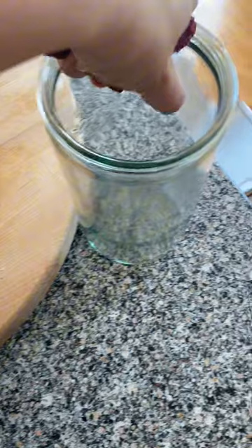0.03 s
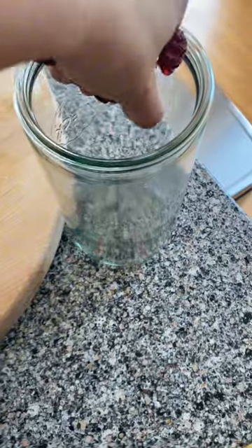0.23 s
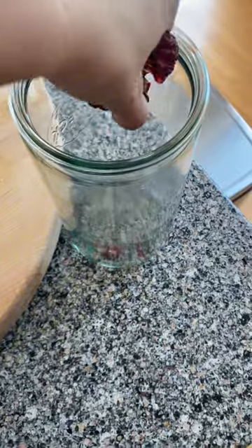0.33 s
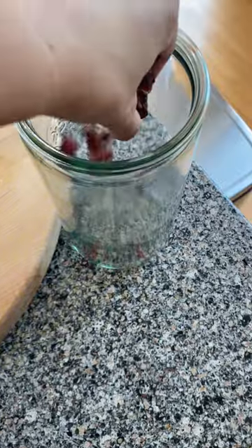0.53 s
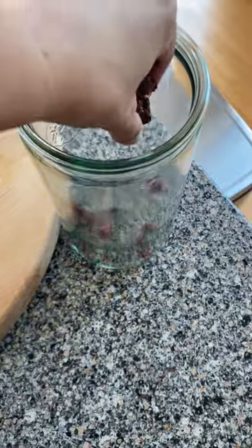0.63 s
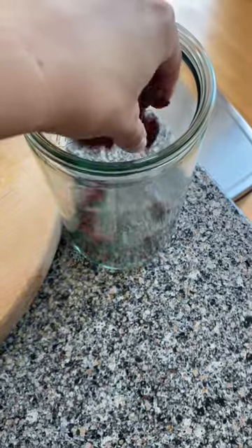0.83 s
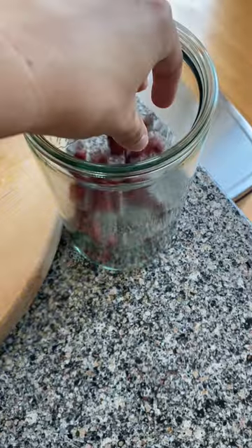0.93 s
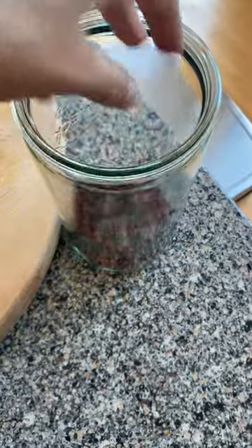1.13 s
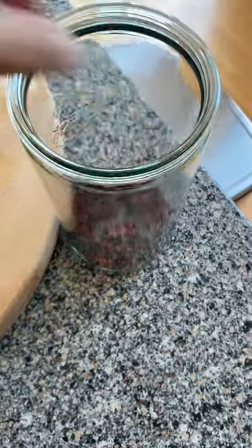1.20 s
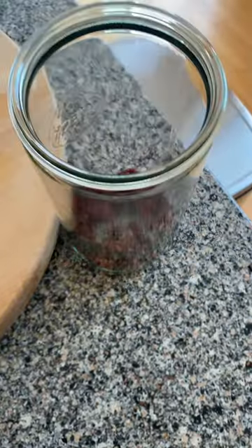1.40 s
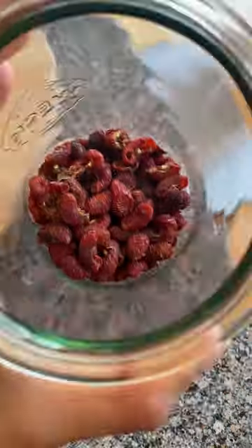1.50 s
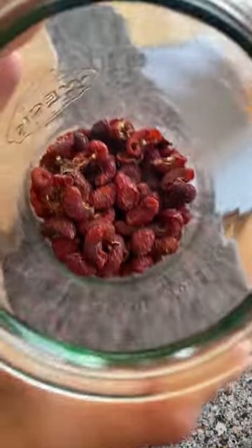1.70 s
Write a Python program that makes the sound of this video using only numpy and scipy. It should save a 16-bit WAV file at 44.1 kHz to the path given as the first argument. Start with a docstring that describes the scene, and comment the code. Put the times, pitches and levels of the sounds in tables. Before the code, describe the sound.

Dried berries clatter into a glass jar, heard close in a quiet kitchen. At 0.1 seconds the jar bumps a stone counter with a hollow thud. A few berries click in from 0.25 seconds, then denser spills come around 0.6 to 0.8 and 1.0 seconds, briefly ringing the glass. They tumble and settle by 1.45 seconds. A very faint knock follows near 1.6 seconds, over soft rumble and hiss.

```python
"""A hand knocks a glass jar against a stone counter: the foot thuds, the air inside booms.
From 0.23 s dried berries fall into it in a few spills. Each snaps, clatters in the jar's air
and rings the glass; the rest tumble and settle by 1.45 s. One faint knock follows at 1.58 s.
A close microphone pair hears it all in a quiet kitchen, over soft rumble and hiss."""
import sys
import numpy as np
from scipy import signal
from scipy.fft import rfft, irfft, next_fast_len
from scipy.io import wavfile

SR = 44100
rng = np.random.default_rng(int(sys.argv[2]) if len(sys.argv) > 2 else 0)


def to_wav(sig):
    """Store sig (one row per channel, or 1-D mono) as 16-bit WAV at the path in sys.argv[1].

    Samples outside -1..1 are clipped; the rate is SR.
    """
    pcm = np.clip(np.atleast_2d(sig), -1, 1) * 32767
    pcm = np.round(pcm).astype(np.int16)
    wavfile.write(sys.argv[1], SR, pcm.T)  # frames by channels


N = 77175

# berry landings: start_s, snap_db, clatter_db, hardness_db_per_oct, base_db, wall_db, upper_twin_share
LANDINGS = [ (0.229, -48, -65, -6.5, -59, -40, .5), (0.2657, -17, -29, 8, -25, -35, 0),
            (0.363, -29.5, -42, 10, -64, -34, .5), (0.408, -43, -49.5, -3.5, -55, -46.5, .5),
            (0.4619, -44.5, -48.5, 1.5, -69, -61, .5), (0.5104, -49.5, -55, -2, -89, -77, .5),
            (0.5959, -13, -29.5, 3.5, -28.5, -49.5, 1), (.598, -21.5, -36, 5.5, -45, -53, 1),
            (0.6322, -29.5, -27.5, 0.5, -33.5, -44.5, 1), (.645, -18.5, -31.5, 17.5, -45.5, -47, 1),
            (0.6506, -31.5, -32.5, 1.5, -24, -45.5, 1), (0.6611, -35.5, -35.5, -2.5, -39, -52, 1),
            (.670, -33.5, -36, 1, -27, -63.5, 1), (0.7053, -35.5, -43, 6, -52.5, -38.5, .5),
            (.722, -38.5, -45.5, 8.5, -50.5, -39.5, .5), (.7418, -40, -37.5, 0, -31.5, -59, 0),
            (.750, -34.5, -49, -2, -49.5, -52, 0), (.7675, -34.5, -49.5, 4.5, -46, -61.5, 0),
            (.7812, -31, -40.5, 2.5, -35, -58, 0), (0.8046, -9.5, -29, 14.5, -40, -49, 0),
            (0.827, -29.5, -47.5, -1, -56.5, -53.5, 0), (.855, -42.5, -48, -4.5, -45.5, -60.5, 0),
            (0.8924, -49, -48, 4.5, -41.5, -43, 0), (0.911, -34, -55, 6.5, -66.5, -53, 0),
            (.9605, -31, -32.5, 0.5, -41, -40.5, 1), (.965, -27, -28, -0.5, -35.5, -51.5, .5),
            (.970, -27, -41.5, -2, -44.5, -53.5, .5), (.983, -27, -27.5, -1, -30, -39.5, 1),
            (.9897, -32, -39.5, 8, -22, -49.5, 1), (1.0152, -25.5, -30.5, 0, -33, -35, 1),
            (1.021, -35, -32, -1, -41, -47.5, .5), (1.027, -29.5, -22.5, 2, -24.5, -40.5, 1),
            (1.0371, -27, -26.5, 1.5, -27.5, -42.5, .5), (1.053, -33, -42, 6, -37.5, -54, 1),
            (1.0895, -27, -55.5, -2.5, -51.5, -57.5, .5), (1.1087, -22, -32.5, 2.5, -45.5, -48.5, .5),
            (1.1738, -53, -61, -10, -48.5, -71, 0), (1.320, -72.5, -77.5, -4, -63.5, -88.5, 1),
            (1.359, -74.5, -71, -5, -71.5, -89.5, 1), (1.4442, -76, -77.5, -4.5, -64.5, -91.5, 1)]
# glass modes, twin base modes first: pitch_hz, base_hit_db, wall_hit_db, t60_s
GLASS_MODES = [(3715.4, 3.5, -25.5, 0.2), (3761, 5.5, -17, 0.11), (1413.7, -30, -18, 0.75),
               (2815, -39.5, -9, 0.17), (3265, -31, 1, 0.21), (3367, -29.5, -2.5, .25),
               (3714, -13, -29, .15), (4160, -9.5, -19.5, 0.13), (4400, -27.5, -5.5, 0.093),
               (5050, -20, -29, .13), (5750, -17, -26, 0.1), (6100, -25, -3.5, 0.083), (7410, -3, -13, .14),
               (7535, -7, -20, .11), (10570, -20, -18.5, .17), (11930, -15.5, -18.5, .11),
               (13827, -29, -23.5, .12)]
# air modes of the jar: pitch_hz, knock_db, berry_db, t60_s
AIR_MODES = [(347, 3, -26.5, 0.18), (678, -24, -25, 0.11), (1116.8, -17, -5, 0.064),
             (1246, -20, -16.5, .12), (2003, -24, -17.5, 0.21)]
# berry contact: freq_hz, density_db
SNAP_SPECTRUM = [(200, -33), (1100, -19), (2500, -24), (4500, -30), (7800, 10), (10000, -11.5),
                 (13000, -12.5), (16500, -27.5)]
# echoes in the jar: freq_hz, density_db
CLATTER_SPECTRUM = [(100, -30), (400, -19.5), (750, -5.5), (1150, -5.5), (1550, -16), (2100, -4.5),
                    (3050, -8), (3400, -3), (4200, 3.5), (5300, 1.5), (7300, 3.5), (9000, -5), (11000, -8),
                    (12200, -5.5), (14500, -16.5), (15600, -6), (16200, -40)]
# tumbling contacts: time_s, level_db
TUMBLE_ENVELOPE = [(.05, -110), (.075, -57.5), (.10, -70.5), (.22, -73.5), (.28, -39.5), (.34, -72),
                   (.42, -50), (.57, -76), (.62, -55.5), (.66, -44), (.70, -52.5), (.79, -46), (.94, -51.5),
                   (.99, -37.5), (1.04, -27.5), (1.08, -40.5), (1.17, -53.5), (1.28, -64), (1.38, -110)]
# jar rocking on the counter: start_s, thud_db, air_db, glass_db
KNOCK_HITS = [(.060, -51.5, -69.5, -72), (0.101, -40, -64.5, -81), (0.1114, -20.5, -41, -39.5),
              (0.1153, -26.5, -14, -50.5), (.1272, -27.5, -33, -45.5), (1.581, -61.5, -74, -92.5)]
# foot on stone: freq_hz, density_db
THUD_SPECTRUM = [(30, -30.5), (110, -22.5), (205, -7), (400, 3), (600, -10), (800, -10), (1350, -6),
                 (1800, -16.5), (2800, -22.5), (5000, -44.5), (15000, -44)]
# room decay: freq_hz, t60_s
ROOM_DECAY = [(150, 0.33), (350, 0.72), (1000, 0.47), (4000, 0.52), (8000, 0.15), (15000, 0.21)]
# room tail: freq_hz, gain_db
ROOM_SPECTRUM = [(150, -7), (250, -12), (350, -23), (500, -9.5), (800, -7), (2500, -14.5), (4000, -21),
                 (8000, -11), (15000, -4.5)]
# room tail, left to right: freq_hz, coherence
ROOM_COHERENCE = [(150, 1), (700, .2), (3000, .3), (5000, .6), (7400, 1), (15000, .8)]
# left microphone's phase lead: freq_hz, lead_rad
MIC_LEAD = [(100, 1.5), (380, -1.37), (950, 1.5), (1300, 0), (2300, 0.73), (2900, 2.04), (3500, 1.16),
            (4400, 1.5), (5000, 1.12), (6100, 1.5), (6950, 3.08), (7900, 3.2), (8700, 4.5), (9900, 5.5),
            (11500, 8), (12700, 8), (14700, 10.5), (15300, 23)]
# microphone balance: freq_hz, left_minus_right_db
MIC_BALANCE = [(200, 2), (480, -4), (1000, 1.5), (1900, 0), (2350, -3.5), (3100, 0.5), (3800, -1),
               (5000, 0.5), (7000, 1)]
# rumble: time_s, level_db
RUMBLE_ENVELOPE = [(0, -72.5), (.15, -65), (.25, -60.5), (.45, -66), (.56, -65), (.7, -65), (1.101, -68.5),
                   (1.399, -74), (1.75, -78.5)]
# rumble: freq_hz, density_db
RUMBLE_SPECTRUM = [(25, -19.5), (42, -17), (58, -1), (95, -5), (125, 3.5), (160, -15.5), (300, -11),
                   (1000, -53)]
# hiss: time_s, level_db
HISS_ENVELOPE = [(0, -68.5), (.55, -62), (1.299, -63.5), (1.48, -70), (1.56, -65.5), (1.63, -67.5),
                 (1.68, -73), (1.75, -71)]
# hiss: freq_hz, density_db
HISS_SPECTRUM = [(60, -15), (180, 0.5), (400, -2.5), (750, -3.5), (1400, -12.5), (2800, -23), (6000, -29.5),
                 (10000, -40.5), (16000, -46)]
# background, left to right: freq_hz, coherence
BACKGROUND_COHERENCE = [(60, .93), (300, 0.56), (800, .4), (3000, 0.11)]

SNAP_GAIN_DB, CONTACT_T60_S = 16.5, 0.0012
ECHO_DB, ECHO_T60_S = 6, 0.13
SCRAPE_DB, SCRAPE_T60_S = 16.5, 0.019
THUD_T60_S, KNOCK_HARDNESS_DB_PER_OCT, KNOCK_WALL_DB = 0.078, 4.5, -9.5
TICKS_PER_S, TICK_SPREAD_DB, TICK_T60_S = 480, 4, 0.01
RING_SAMPLES, ROOM_DELAY_S = 2 ** 15, 0.004
LOW_CUT_HZ, TOP_HZ = 160, 16800


def berries(glass, air):
    """Each landing: a sharp snap, a short scrape, dense echoes in the jar, ringing glass and air."""
    out = np.zeros(N)
    impulse = np.r_[1, np.zeros(RING_SAMPLES // 32)]
    snap = coloured(impulse, SNAP_SPECTRUM)
    jar_response = noise_burst(ECHO_T60_S)
    air_hz, _, air_db, _ = np.transpose(AIR_MODES)
    for start_s, snap_db, clatter_db, hardness, base_db, wall_db, upper_share in LANDINGS:
        contact = noise_burst(CONTACT_T60_S)[:RING_SAMPLES // 256]
        echoes = np.convolve(jar_response, contact / np.linalg.norm(contact))[:RING_SAMPLES]
        scrape = amp(SCRAPE_DB) * noise_burst(SCRAPE_T60_S)
        clatter = (amp(ECHO_DB) * echoes + scrape)[:RING_SAMPLES // 2]
        add(out, start_s, amp(snap_db + SNAP_GAIN_DB) * snap)
        add(out, start_s, amp(clatter_db) / 2 * coloured(clatter, CLATTER_SPECTRUM, hardness))
        add(out, start_s, glass(glass_gains(base_db, wall_db, hardness, upper_share)))
        add(out, start_s, air(amp(clatter_db + air_db + tilt_db(air_hz, hardness))))
    return out


def knocks(glass, air):
    """The jar's foot thuds on stone; the air inside booms, the glass rings."""
    out = np.zeros(N)
    air_mode_db = np.array(AIR_MODES)[:, 1]
    for start_s, thud_db, air_db, glass_db in KNOCK_HITS:
        add(out, start_s, amp(thud_db) * coloured(noise_burst(THUD_T60_S), THUD_SPECTRUM))
        add(out, start_s, air(amp(air_db + air_mode_db)))
        gains = glass_gains(glass_db, glass_db + KNOCK_WALL_DB, KNOCK_HARDNESS_DB_PER_OCT)
        add(out, start_s, glass(gains))
    return out


def tumbling():
    """Berries roll over each other in a shower of tiny ticks."""
    ticks = (rng.random(N) < TICKS_PER_S / SR) * amp(TICK_SPREAD_DB * rng.standard_normal(N))
    power = np.abs(signal.fftconvolve(ticks ** 2, decay(TICK_T60_S) ** 2)[:N])
    shower = unit_rms(np.sqrt(power) * rng.standard_normal(N))
    return coloured(shower * gain_curve(TUMBLE_ENVELOPE), CLATTER_SPECTRUM, hardness_db_per_oct=-1.5)


def resonator(modes):
    """Damped modes. Returns strike(gains), with random phases and about 1 dB of scatter per hit."""
    waves = np.array([np.exp(2j * np.pi * hz * np.arange(RING_SAMPLES) / SR) * decay(t60_s)
                      for hz, _, _, t60_s in modes])
    waves *= 1 - decay(t60_s=0.0056)  # attack

    def strike(gains):
        scatter = amp(rng.normal(0, 1, len(modes)))
        phasors = np.exp(2j * np.pi * rng.random(len(modes)))
        return ((gains * scatter * phasors) @ waves).real
    return strike


def glass_gains(base_db, wall_db, hardness_db_per_oct, upper_share=0):
    """Mode gains for one blow; where it lands splits the energy between the twin base modes."""
    hz, base_hit_db, wall_hit_db, _ = np.transpose(GLASS_MODES)
    twins = np.r_[np.sqrt([1 - upper_share, upper_share]), np.ones(len(hz) - 2)]
    base = twins * amp(base_db + base_hit_db)
    wall = amp(wall_db + wall_hit_db)
    return np.hypot(base, wall) * amp(tilt_db(hz, hardness_db_per_oct))


def tilt_db(hz, hardness_db_per_oct):
    """Harder contacts favour the treble."""
    return hardness_db_per_oct * np.log2(np.clip(hz, 1500, 10000) / 4500)


def kitchen(x):
    """Short diffuse tail, partly shared by the two microphones."""
    hz, time_s, noise = signal.stft(rng.standard_normal((2, RING_SAMPLES)), SR, nperseg=256)
    damping = np.exp(-np.log(1000) * time_s / at_hz(ROOM_DECAY, hz)[:, None])
    tails = signal.istft(noise * damping, SR, nperseg=256)[1]
    tails = np.pad(tails / np.linalg.norm(tails[0]), ((0, 0), (round(ROOM_DELAY_S * SR), 0)))
    reverb = signal.fftconvolve(x[None], tails, axes=1)[:, :N]
    return stereo(reverb, ROOM_SPECTRUM, ROOM_COHERENCE)


def microphones(x):
    """Sound reaches the pair with a small lag and level difference."""
    sides = np.array([[.5], [-.5]])
    return filtered(x, lambda hz: amp(sides * at_hz(MIC_BALANCE, hz))
                    * np.exp(1j * sides * at_hz(MIC_LEAD, hz)))


def background(spectrum, envelope):
    """Soft stereo noise, nearly mono in the bass."""
    noise = stereo(rng.standard_normal((2, N)), spectrum, BACKGROUND_COHERENCE)
    return unit_rms(noise) * gain_curve(envelope)


def stereo(pair, spectrum, coherence):
    """Two unrelated signals to left and right, with given spectrum and coherence."""
    def response(hz):
        angle_rad = np.arccos(at_hz(coherence, hz)) / 2
        return amp(at_hz(spectrum, hz)) * [np.cos(angle_rad), np.sin(angle_rad)]
    mid, side = filtered(pair, response)
    return np.array([mid + side, mid - side])


def coloured(x, spectrum, hardness_db_per_oct=0):
    """Minimum-phase filter of unit energy."""
    size = next_fast_len(len(x) + RING_SAMPLES // 8)
    size += size % 2
    hz = np.fft.rfftfreq(size, 1 / SR)
    magnitude = unit_rms(amp(at_hz(spectrum, hz) + tilt_db(hz, hardness_db_per_oct)))
    cepstrum = irfft(np.log(magnitude))
    cepstrum[1:size // 2] *= 2
    cepstrum[size // 2 + 1:] = 0
    return irfft(rfft(x, size) * np.exp(rfft(cepstrum)))[:len(x)]


def filtered(x, response):
    """Apply a complex response(hz)."""
    size = next_fast_len(N + SR // 2)
    hz = np.fft.rfftfreq(size, 1 / SR)
    return irfft(rfft(x, size) * response(hz), size)[..., :N]


def amp(db):
    return 10 ** (np.asarray(db) / 20)


def unit_rms(x):
    return x / np.sqrt(np.mean(x ** 2) + 1e-20)


def at_hz(points, hz):
    """Interpolate on a log frequency axis."""
    freq_hz, values = np.transpose(points)
    return np.interp(np.log(hz + 1), np.log(freq_hz + 1), values)


def gain_curve(envelope):
    """Points of time_s, level_db to one gain per sample."""
    return amp(np.interp(np.arange(N) / SR, *np.transpose(envelope)))


def decay(t60_s):
    return np.exp(-np.log(1000) * np.arange(RING_SAMPLES) / SR / t60_s)


def noise_burst(t60_s):
    return rng.standard_normal(RING_SAMPLES) * decay(t60_s)


def add(track, start_s, sound):
    part = track[round(start_s * SR):][:len(sound)]
    part += sound[:len(part)]


def scene():
    """Jar, room, background."""
    glass, air = resonator(GLASS_MODES), resonator(AIR_MODES)
    jar = knocks(glass, air) + berries(glass, air) + tumbling()
    # the jar's sounds carry no deep bass
    jar = signal.sosfilt(signal.butter(2, LOW_CUT_HZ, "highpass", fs=SR, output="sos"), jar)
    jar_in_room = microphones(jar + kitchen(jar))
    rumble = background(RUMBLE_SPECTRUM, RUMBLE_ENVELOPE)
    hiss = background(HISS_SPECTRUM, HISS_ENVELOPE)
    return jar_in_room + rumble + hiss


def record(dry):
    """Steep low-pass at the band limit."""
    return filtered(dry, lambda hz: 1 / np.sqrt(1 + (hz / TOP_HZ) ** 200))


dry = scene()
out = record(dry)
to_wav(out)
```